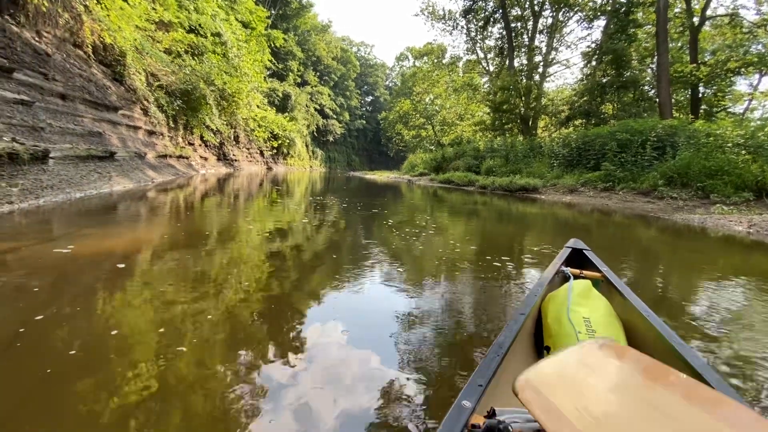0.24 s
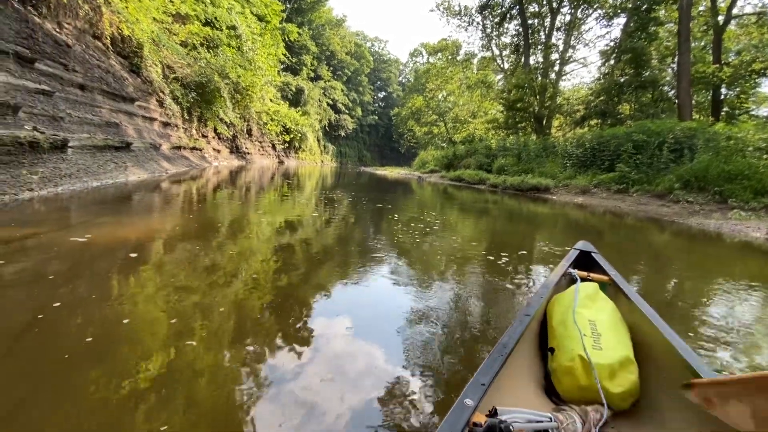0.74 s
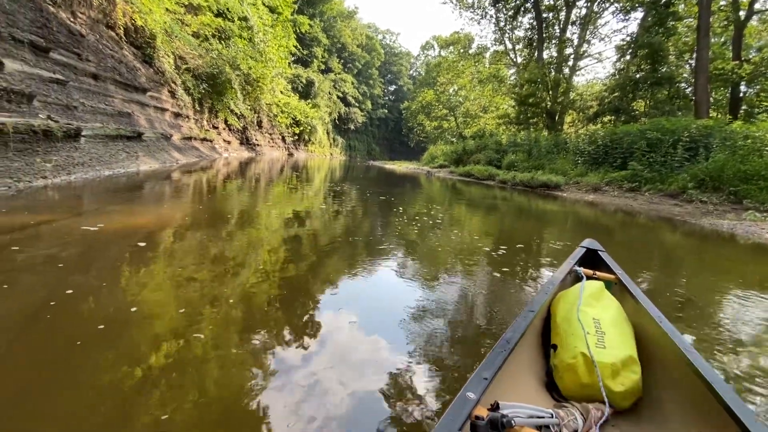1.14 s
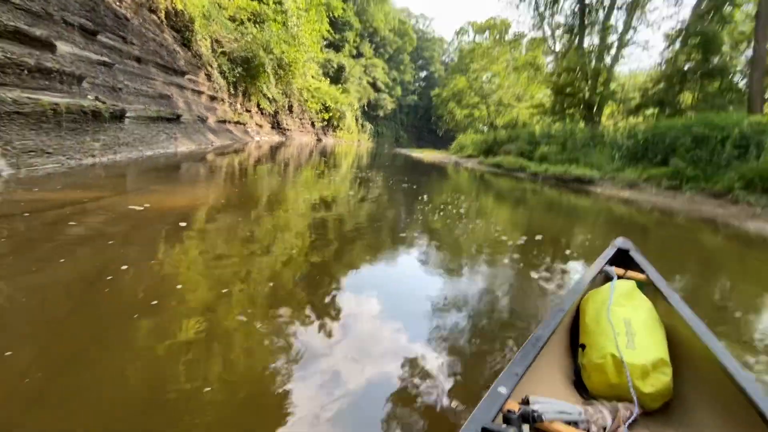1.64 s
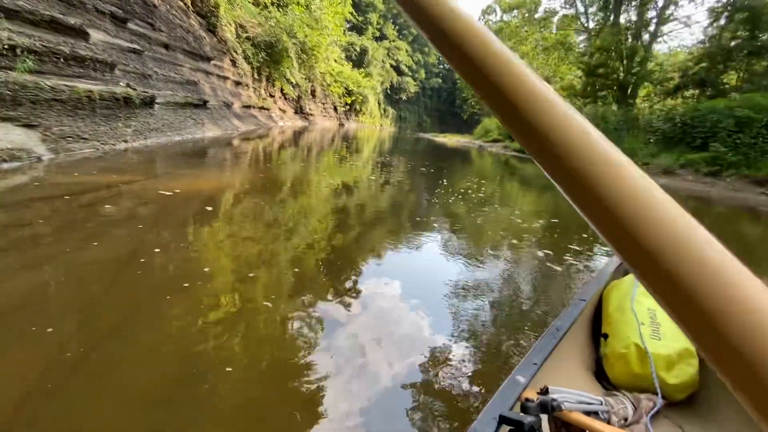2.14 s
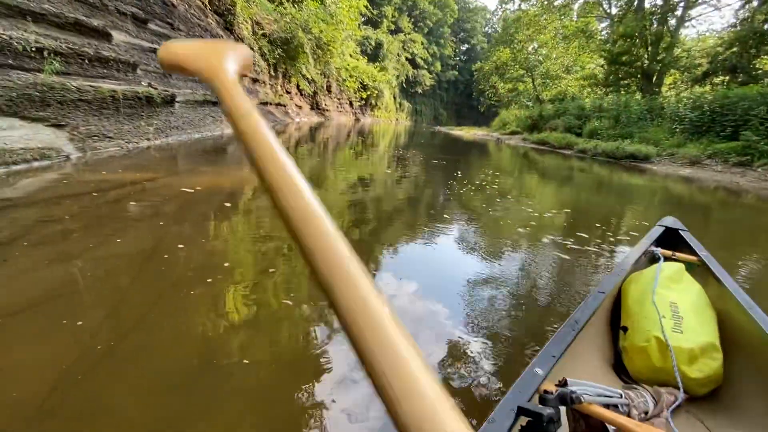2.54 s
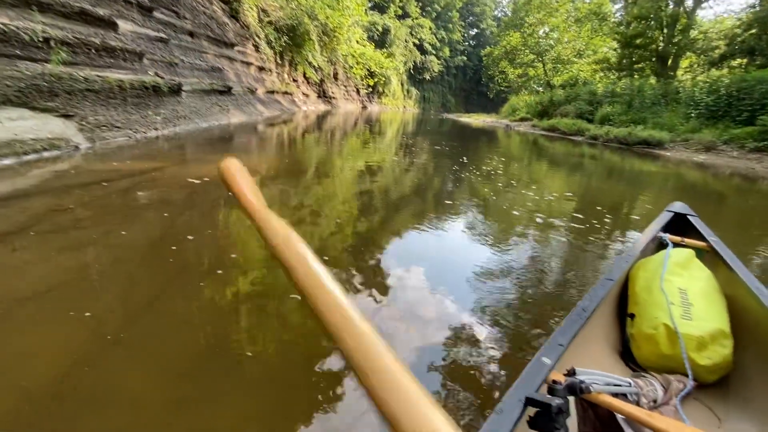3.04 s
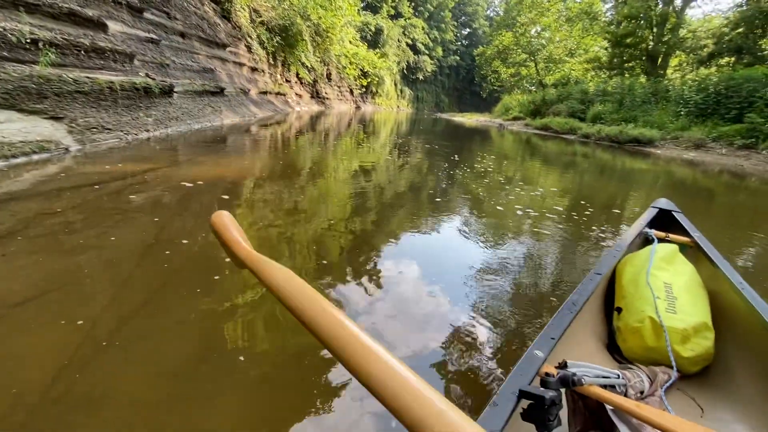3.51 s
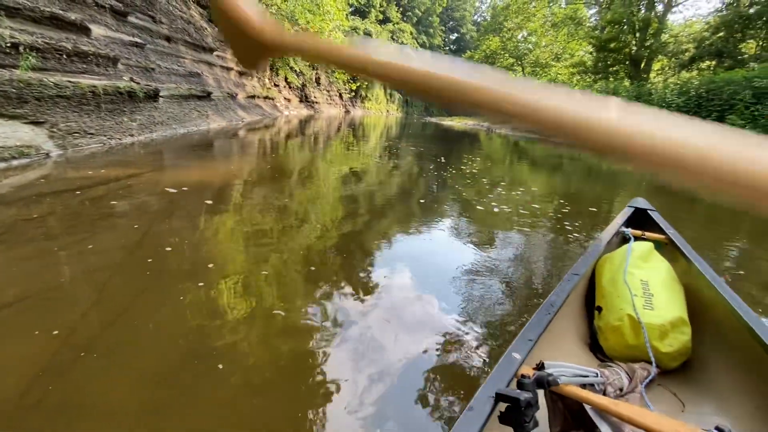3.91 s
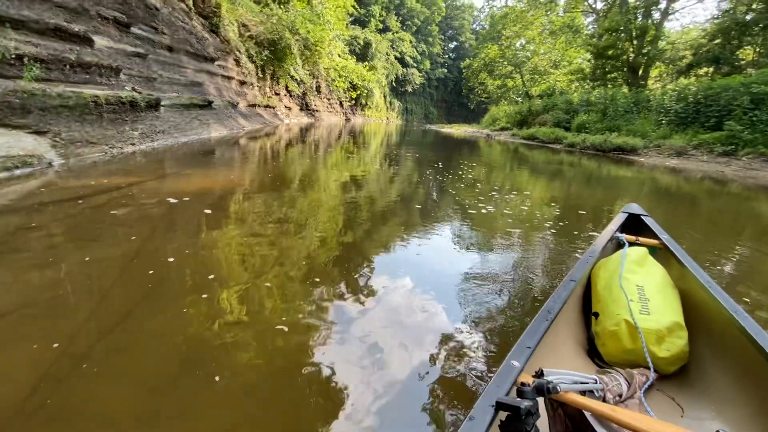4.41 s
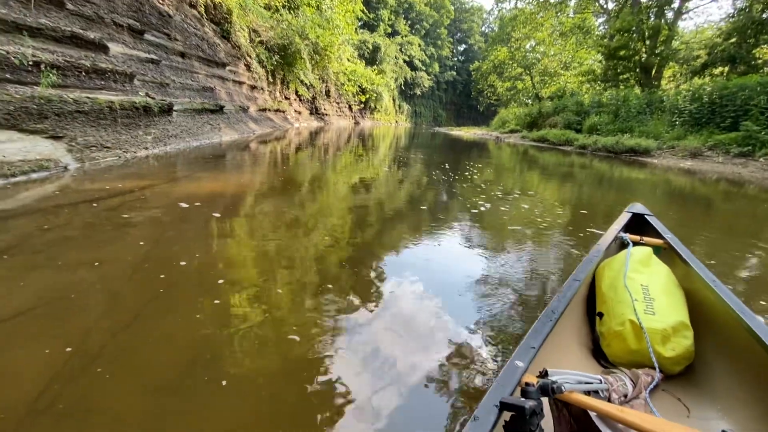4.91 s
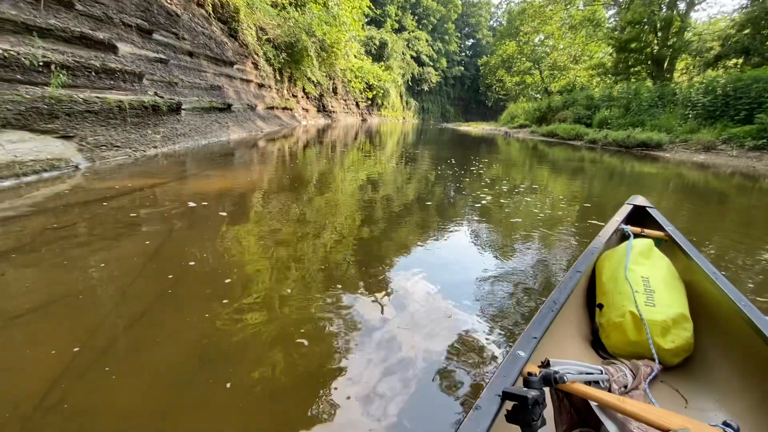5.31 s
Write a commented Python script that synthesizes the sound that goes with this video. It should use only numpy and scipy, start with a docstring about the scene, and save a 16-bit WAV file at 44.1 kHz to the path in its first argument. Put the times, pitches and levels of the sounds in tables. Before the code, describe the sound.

A wooden paddle knocks against a canoe hull, then splashes and drips in the water as birds chirp along a quiet river.

```python
"""A quiet wooded river, from a drifting canoe. A wooden paddle knocks and drags on the hull, setting
something loose buzzing, then taps and slides on a fitting; each body rings in its own modes.
Water plops with ringing air pockets, splashes and drips at the blade, and laps along the hull.
Birds whistle and trill from the banks, smeared by the trees, over a bed of distant leaves and water."""
import sys
import numpy as np
from scipy import signal
from scipy.io import wavfile
from scipy.ndimage import uniform_filter1d

SR = 44100
rng = np.random.default_rng(int(sys.argv[2]) if len(sys.argv) > 2 else 0)


def dump(signal):
    """Clip the signal to [-1, 1] and save it as 16-bit WAV at the path in sys.argv[1]."""
    limited = np.clip(np.atleast_2d(signal).T, -1, 1)
    pcm = np.round(limited * 32767).astype(np.int16)
    wavfile.write(sys.argv[1], SR, pcm)


N = 245195
T = np.arange(N) / SR

# resonances of hull and fitting; pan is always left minus right:
# (pitch [Hz], level [dB], t60 [s], pan [dB])
HULL_MODES = [(59.3, -10.5, 0.44, -6), (106.4, -5, 0.26, -2.5), (134.13, -12, 0.28, -0.5),
              (174.5, -6.5, 0.16, -5), (237.6, -12.5, 0.17, 2.5), (287.3, -7.5, 0.16, 0.5),
              (408.6, -5.5, 0.059, -5.5), (598.5, -4, 0.14, -2.5), (694.7, 1.5, 0.059, -4.5),
              (927, 2, .065, -10.5), (994.5, -8, 0.085, -17.5), (1364, -9.5, 0.054, -16.5),
              (1555, -6.5, 0.051, 4), (1804, -3, .028, 4.5), (2630, -15.5, 0.042, -8.5),
              (2790, -18.5, 0.077, -1), (3225, -13, 0.034, 9.5), (3774, -28.5, 0.037, 22.5)]
FITTING_MODES = [(90, -24.5, 0.27, 4.5), (162, -20, 0.13, 1.5), (325, -17, 0.082, -8),
                 (590, -9.5, 0.053, -1), (1010, -2, 0.025, -8.5), (1077, -3, 0.031, 8.5),
                 (1574, 4, 0.014, -1.5), (2757, -5, 0.021, 10), (2990, -14, 0.0083, -6),
                 (3950, -11, 0.029, 13), (4696, -13, 0.016, 27.5), (9700, -29.5, 0.0074, 8.5),
                 (14100, -1, .008, 2.5)]
# paddle hits, crisper the shorter the contact: (time [s], strength [dB], contact [ms])
HULL_KNOCKS = [(2.1426, -20, 0.023), (2.1456, -11, .15), (2.19, -16, 0.12), (2.216, -21, 0.17),
               (2.232, -23, 0.69), (2.312, -39.5, 1), (2.575, -54.5, 0.15)]
FITTING_TAPS = [(2.7364, -26, 0.22), (2.761, -40, 0.11), (2.779, -45, 0.05), (2.7982, -13, 0.32),
                (2.806, -25, 0.023), (2.808, -48, 0.078), (2.868, -38, 0.24), (2.929, -55, 0.1),
                (2.9805, -40, 0.024), (3.034, -51.5, 0.23), (3.047, -50.5, 0.14)]
# pressure of the dragging shaft: (time [s], level [dB])
HULL_PRESSURE = [(2.15, -75), (2.165, -47.5), (2.183, -49), (2.236, -42.5), (2.252, -65.5), (2.451, -78),
                 (2.5, -89)]
FITTING_PRESSURE = [(2.733, -87), (2.76, -67), (2.789, -69.5), (2.807, -39.5), (2.82, -56.5),
                    (2.865, -59.5), (2.876, -75.5), (2.92, -78), (2.94, -73), (2.989, -72.5), (3.07, -91)]
# swells of the loose part's buzz: (middle [s], length [s], level [dB])
BUZZ_SWELLS = [(2.315, 0.021, -49.5), (2.377, 0.079, -63)]

# ringing air pockets: (time [s], start pitch [Hz], level [dB])
AIR_POCKETS = [(.01, 1600, -43), (.012, 468, -56), (.045, 289, -61.5), (4.619, 312, -41.5),
               (4.636, 1006, -42.5), (4.64, 412, -41.5), (4.642, 2260, -51), (4.656, 2090, -38),
               (4.657, 2630, -45), (4.659, 1495, -30.5), (4.66, 955, -38.5), (4.672, 476, -56.5),
               (4.7, 943, -48), (4.794, 3240, -53), (4.835, 2170, -51.5), (4.846, 468, -60.5),
               (4.878, 1146, -47.5), (4.885, 700, -56.5), (5.003, 415, -60.5), (5.089, 1095, -38.5),
               (5.106, 1236, -45), (5.118, 1210, -56)]
# a hollow opening behind the blade: (time [s], length [s], start pitch [Hz], end pitch [Hz], level [dB])
BLADE_GULPS = [(5.062, 0.0299, 820, 202.4, -44)]
# broad sloshes of the blade: (time [s], level [dB])
BLADE_SLOSHES = [(4.632, -38.5), (4.665, -50), (4.84, -53)]
# drops and spray landing: (time [s], level [dB], centre [Hz], pan [dB])
DROP_HITS = [(.707, -58, 5600, 12), (1.755, -62, 4330, 4), (3.57, -52, 3980, 3), (3.686, -57.5, 6050, -6),
             (3.92, -58, 5000, -9), (4.62, -46, 6600, -1), (4.647, -45, 4650, 7.5), (4.725, -52.5, 6000, 6),
             (4.793, -59.5, 8740, -5), (4.816, -51, 10050, -1), (4.827, -54, 8100, 18),
             (4.829, -51.5, 3980, 4), (4.832, -48.5, 9800, -9), (4.875, -44.5, 2130, 14),
             (4.8768, -46.5, 9000, 1), (4.878, -51.5, 4500, 21), (5.066, -61.5, 5500, 6.5),
             (5.379, -56.5, 2140, -8), (5.455, -63, 5960, 1), (5.541, -50.5, 3000, -1)]
# soft swishes along the hull: (middle [s], level [dB])
LAP_SWELLS = [(0.018, -61.5), (.72, -72.5), (.99, -74), (1.228, -74), (1.57, -75), (1.96, -92),
              (2.6, -71.5), (3.35, -75.5), (3.571, -70.5), (3.8, -71), (3.92, -66.5), (4.12, -69.5),
              (4.3, -76), (4.719, -68), (4.831, -70), (5.11, -74.5), (5.53, -68)]

# bird notes that scoop up and hold: (time [s], top pitch [Hz], level [dB], pan [dB])
BIRD_SCOOPS = [(0.083, 3007, -57, 2), (.11, 3950, -59, 9), (.235, 3950, -59, 9.5), (.36, 3900, -58.5, 8),
               (.49, 4050, -62.5, 7), (4.038, 3950, -62, 6), (4.16, 3950, -63.5, 4.5), (4.28, 3900, -62, 7)]
# high chirps that flick up and droop: (time [s], top pitch [Hz], level [dB], pan [dB])
BIRD_FLICKS = [(1.066, 6180, -71.5, 7), (1.308, 6190, -76, 2)]
# nearly level whistles: (time [s], length [s], pitch [Hz], level [dB], pan [dB])
BIRD_WHISTLES = [(0, 0.052, 4033, -59.5, 11.5), (.55, .1, 4013, -65, 4), (.966, 0.034, 2620, -75, 9),
                 (1.296, .1, 4750, -83, 14), (1.52, 0.093, 2300, -73.5, 0), (3.17, 0.11, 7540, -79.5, -2),
                 (3.194, .1, 4090, -81, 11), (3.469, 0.081, 5800, -70.5, 6), (3.676, 0.11, 2940, -64, -1.5),
                 (4.31, 0.075, 2993, -65, -5), (4.369, 0.21, 4850, -77, 6.5), (4.385, 0.21, 2967, -74, 3),
                 (4.549, 0.05, 1790, -76, 4), (4.93, .12, 4060, -79.5, 5), (5.1, .12, 5010, -77.5, 7),
                 (5.15, 0.23, 7510, -83, 8), (5.15, 0.2, 8500, -85, 2), (5.311, .13, 5020, -78, 1),
                 (5.5, 0.043, 5060, -69, 9)]
# quick slides: (time [s], length [s], start pitch [Hz], end pitch [Hz], level [dB], pan [dB])
BIRD_SLIDES = [(0.072, 0.13, 7730, 4430, -65, 7), (.197, 0.0393, 3050, 2430, -61.5, 3),
               (0.601, 0.04, 4700, 6520, -69, 5), (3.288, .044, 3896, 3504, -69.5, 12),
               (3.437, 0.048, 6590, 5700, -70, 5)]
# hoarse rising calls: (time [s], level [dB], pan [dB])
BIRD_RASPS = [(3.618, -62.5, -5), (4.246, -65, -9)]
# runs of falling chirps:
# (time [s], length [s], rate [chirps/s], start pitch [Hz], end pitch [Hz], level [dB], pan [dB])
BIRD_TRILLS = [(0.001, 0.52, 24, 4400, 2024, -62, 2.5), (0.169, .2, 9.7, 7640, 4460, -74, 6.5),
               (0.666, .12, 17, 6610, 3500, -70.5, 4.5), (0.819, .24, 14, 2900, 2195, -72.5, 1),
               (1.357, .1, 31, 6060, 4480, -76.5, 4), (1.438, .25, 13, 2948, 2203, -77.5, -1.5),
               (3.52, .5, 14.1, 5910, 3023, -61.5, 5.5), (4.079, .3, 14, 3795, 2290, -68, 4),
               (4.413, .14, 23, 4760, 3454, -65, 2), (5.339, .25, 16, 5380, 3426, -71.5, 5)]

# tone curve of distant leaves and water: (frequency [Hz], relative level [dB])
BED_SPECTRUM = [(15, -32), (25, -6), (69, -4), (172, -19.5), (1090, -23.5), (1720, -22.5), (2020, -26.5),
                (2300, -27.5), (3180, -30), (4300, -32.5), (6040, -30.5), (15000, -65)]


def paddle_on(modes, blows, drag, slips_per_s, slip_hz, swell_cycles, twist_rad, crack_db, crack_hz,
              crack_s, rasp_db, dense_db, dense_hz, dense_s, left_lag_ms):
    """Blows and stick-slip clicks ring a body; slow bending waves arrive late, so each mode swells in."""
    t = np.arange(SR // 2) / SR
    body = np.zeros((2, len(t)))
    for k, (hz, db, t60, pan_db) in enumerate(modes):
        # neighbouring modes differ in shape, so they reach left and right in different phase
        wave = np.sin(2 * np.pi * hz * t + (-1) ** k * spread(twist_rad))
        swell = (1 - np.exp(-t * hz / swell_cycles)) ** 2
        body += undb(db + spread(pan_db / 2)) * swell * decay(t, t60) * wave
    # the many weak modes between the strong ones blur into a short hiss
    hiss = band(rng.standard_normal((2, len(t))), dense_hz, 2 * dense_hz)
    body += undb(dense_db) * hiss * np.exp(-t / dense_s)

    drag_s, drag_db = np.transpose(drag)
    pressure = undb(np.interp(T, drag_s, drag_db, -200, -200))
    chance, size = rng.random((2, N))
    slips = (chance < slips_per_s / SR) * np.log(size) * pressure
    # slips tug either way; a soft surface rounds them off
    force = butter(slips * rng.choice([-1, 1], N), 1, slip_hz, "low")
    chatter_level = pressure * undb(rasp_db)
    crack = np.minimum(t / .0014, 1) * np.exp(-t / crack_s)
    for s, db, contact_ms in blows:
        i, ms = int(s * SR), np.clip(contact_ms, .03, 2)
        push = np.hanning(int(ms * SR / 500) + 3)
        force[i:i + len(push)] += undb(db) * push / push.sum()
        # the surfaces chatter for a moment, the more the harder they meet
        chatter_level[i:i + len(t)] += undb(db + crack_db) / ms * crack

    ring = signal.fftconvolve(body, force[None], axes=1)[:, :N]
    mid, side = rng.standard_normal((2, N))
    chatter = butter(chatter_level * (mid + spread(.4 * side)), 2, [1200, crack_hz], "band")
    return lag_left(ring + chatter, left_lag_ms)


def loose_buzz():
    """Something loose in the boat buzzes on after the knock: narrow noise in short swells."""
    swell = sum(undb(db) * np.exp(-(2.9 * (T - s) / length) ** 2) for s, length, db in BUZZ_SWELLS)
    return noise_band(hz=1006, width_hz=143) * swell * undb(spread(-3))


def blade_water():
    """The blade works on the right: air pockets ring and rise, a hollow gulps, water sloshes and drips."""
    out = np.zeros((2, N))
    for s, hz, db in AIR_POCKETS:
        length = .02 * (1000 / hz) ** .72  # smaller pockets ring higher and shorter
        add(out, glide(length, hz, hz + 100, attack=.088, waver=.083), s, db, pan_db=-2.5)
    for s, length, hz0, hz1, db in BLADE_GULPS:
        add(out, glide(length, hz0, hz1, attack=.23, waver=.017, reach=.57), s, db, pan_db=-2.5)
    for s, db in BLADE_SLOSHES:
        add(out, splash(hz=1300, width_hz=1660, t60=.25), s, db, pan_db=-3)
    for s, db, hz, pan_db in DROP_HITS:
        t60 = .11 * (1000 / hz) ** .51  # finer spray dies sooner
        add(out, splash(hz, min(1.4 * hz, 4530), t60), s, db, pan_db)
    return lag_left(out, ms=.35)


def splash(hz, width_hz, t60):
    """Water hits a surface: a puff of band noise that starts at once and dies away."""
    t = np.arange(SR // 8) / SR
    return noise_band(hz, width_hz, len(t)) / 2 * decay(t, t60) * np.minimum(t / .00063, 1)


def lapping(swish_s=.13):
    """Water laps along the hull in soft swishes of tiny bubbles and spray."""
    swish = sum(undb(db) * np.exp(-(2.5 * (T - s) / swish_s) ** 2) for s, db in LAP_SWELLS)
    bubbles = np.zeros((2, N))
    for when, pitch, size, side in rng.random((3000, 4)):
        hz = 140 * 21 ** pitch
        blip = glide(5 / hz, hz, 1.1 * hz, attack=.28)
        add(bubbles, blip, when * T[-1], db=-3 * np.log(size), pan_db=12 * side - 6)
    spray = unit(band(rng.standard_normal((2, N)), hz=1220, width_hz=3100))
    spray *= undb(2 * wander(24.87) + 2)
    return (unit(bubbles) + spray) * swish


def birds():
    """Wavering whistles from the banks; the rasps and trills come through mostly as echo."""
    notes, far_calls = np.zeros((2, 2, N))
    for s, hz, db, pan_db in BIRD_SCOOPS:
        scoop = glide(.0759, .82 * hz, hz, attack=.33, waver=.025, reach=.33, sag=.0496)
        add(notes, scoop, s, db, pan_db)
    for s, hz, db, pan_db in BIRD_FLICKS:
        flick = glide(.1, .73 * hz, hz, attack=.29, waver=.011, reach=.3, sag=.1)
        add(notes, flick, s, db, pan_db)
    for s, db, pan_db in BIRD_RASPS:
        add(far_calls, glide(.06, hz0=1980, hz1=2594, attack=.3, waver=.079), s, db, pan_db)
    for s, length, hz, db, pan_db in BIRD_WHISTLES:
        add(notes, glide(length, hz, .96 * hz, attack=.24, waver=.012), s, db, pan_db)
    for s, length, hz0, hz1, db, pan_db in BIRD_SLIDES:
        add(notes, glide(length, hz0, hz1, attack=.34, waver=.03), s, db, pan_db)
    for s, length, rate, hz0, hz1, db, pan_db in BIRD_TRILLS:
        for k, (late, sharp) in enumerate(rng.standard_normal((16, 2))):
            chirp = glide(.99 / rate, hz0 * (1 + .049 * sharp), hz1, attack=.3, waver=.02)
            if k / rate < length:
                add(far_calls, chirp, s + (k + .06 * late) / rate, db, pan_db)
    flutter = undb(2.1 * wander(40) + 3.9 * wander(250))
    direct = flutter * (undb(-1) * notes + undb(-11) * far_calls)
    return direct + woods_echo(notes + far_calls)


def woods_echo(calls, t60=.65, wet_db=4):
    """Trunks and leaves scatter the calls into a soft, wide tail."""
    t = np.arange(SR) / SR
    tail = rng.standard_normal((2, SR)) * decay(t, t60) * np.minimum(t / .01, 1)
    tail *= undb(wet_db) / np.sqrt(np.sum(tail ** 2) / 2)
    return signal.fftconvolve(calls, tail, axes=1)[:, :N]


def river_bed_tone(level_db=-67):
    """Distant leaves and water: half-octave noise bands that swell together and flicker alone."""
    out, swell = 0, wander(7.2)
    curve_hz, curve_db = np.transpose(BED_SPECTRUM)
    for hz in 30 * 2 ** np.arange(0, 9, .5):
        mid, side = band(rng.standard_normal((2, N)), hz, hz / 3)
        mono = 1 / (1 + (hz / 400) ** 2)  # centred bass, wide treble
        db = np.interp(np.log(hz), np.log(curve_hz), curve_db) + .5 * swell + 2.5 * wander(7.4)
        out += undb(db) * (np.sqrt(1 + mono) * mid + np.sqrt(1 - mono) * spread(side))
    return unit(out) * undb(level_db + spread(1.2))


def glide(length, hz0, hz1, attack, waver=0., reach=.91, sag=0.):
    """A wavering sine slides to hz1 and droops by sag; attack and reach are shares of its length."""
    u = np.arange(int(length * SR)) / (length * SR)
    envelope = np.sin(np.pi / 2 * np.minimum(u / attack, (1 - u) / (1 - attack)))
    wobble = np.interp(u * length, np.arange(64) / 120, rng.standard_normal(64))
    slide = np.minimum(u / reach, 1)
    hz = hz0 * (hz1 / hz0) ** slide * (1 + waver * wobble - sag * u)
    return envelope * np.sin(2 * np.pi * np.cumsum(hz) / SR)


def wander(rate):
    """Random levels held 1 / rate s and smoothed twice."""
    hold = int(SR / rate)
    steps = np.repeat(rng.standard_normal(N // hold + 1), hold)
    return unit(uniform_filter1d(uniform_filter1d(steps, hold), hold)[:N])


def noise_band(hz, width_hz, n=N):
    """Noise band-passed twice for steep edges."""
    return unit(band(band(rng.standard_normal(n), hz, width_hz), hz, width_hz))


def band(x, hz, width_hz):
    """Band-pass with geometric centre hz."""
    low = np.sqrt(hz ** 2 + width_hz ** 2 / 4) - width_hz / 2
    return butter(x, 2, [low, min(low + width_hz, .45 * SR)], "band")


def butter(x, order, hz, kind):
    return signal.sosfilt(signal.butter(order, hz, kind, fs=SR, output="sos"), x)


def add(out, x, s, db, pan_db):
    """Mixes a mono sound in at s seconds."""
    i = int(np.clip(s, 0, T[-1]) * SR)
    out[:, i:i + len(x)] += undb(db + spread(pan_db / 2)) * x[:N - i]


def lag_left(x, ms):
    """A late left channel pulls the sound to the right."""
    return np.array([np.roll(x[0], int(ms * SR / 1000)), x[1]])


def spread(x):
    """Plus on the left, minus on the right."""
    return x * np.array([[1], [-1]])


def decay(t, t60):
    return np.exp(-np.log(1000) * t / t60)


def undb(db):
    return 10 ** (np.asarray(db, float) / 20)


def unit(x):
    return x / np.sqrt(np.mean(x ** 2))


def scene():
    """A hollow knock and a brighter tap up front, with water, birds and the river bank around them."""
    hull = paddle_on(HULL_MODES, HULL_KNOCKS, HULL_PRESSURE, slips_per_s=2500, slip_hz=2470,
                     swell_cycles=.84, twist_rad=.4, crack_db=-26.5, crack_hz=4200, crack_s=.0032,
                     rasp_db=-13.5, dense_db=1, dense_hz=1600, dense_s=.01, left_lag_ms=.41)
    fitting = paddle_on(FITTING_MODES, FITTING_TAPS, FITTING_PRESSURE, slips_per_s=4000, slip_hz=8000,
                        swell_cycles=.36, twist_rad=.37, crack_db=-23, crack_hz=9700, crack_s=.002,
                        rasp_db=8, dense_db=5.5, dense_hz=1834, dense_s=.004, left_lag_ms=.18)
    return hull + fitting + loose_buzz() + blade_water() + lapping() + birds() + river_bed_tone()


def record(dry):
    """The microphone loses the deepest bass, steps down above 11 kHz and is cut at the top."""
    x = butter(dry, 4, 45, "high")
    x = signal.sosfilt(signal.ellip(6, .5, 17, 11400, fs=SR, output="sos"), x)
    return signal.sosfilt(signal.ellip(8, .2, 70, 16200, fs=SR, output="sos"), x)


dry = scene()
out = record(dry)
dump(out)
```